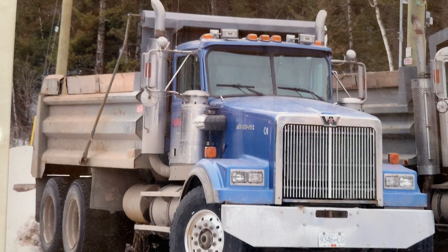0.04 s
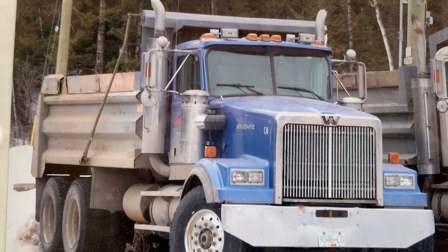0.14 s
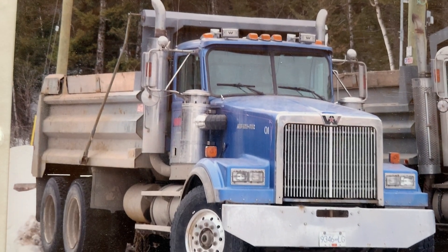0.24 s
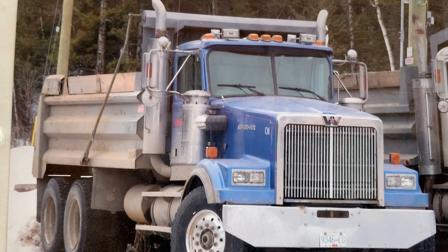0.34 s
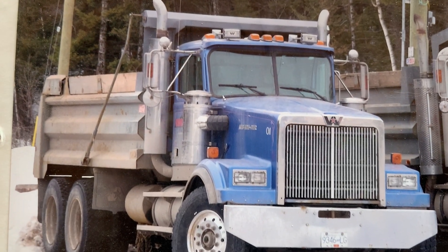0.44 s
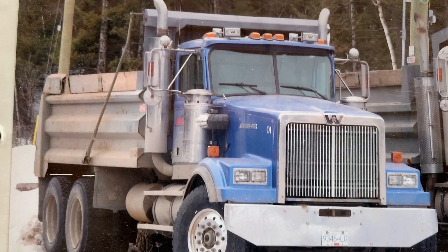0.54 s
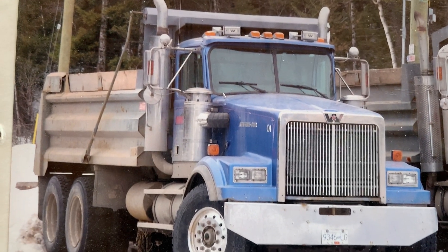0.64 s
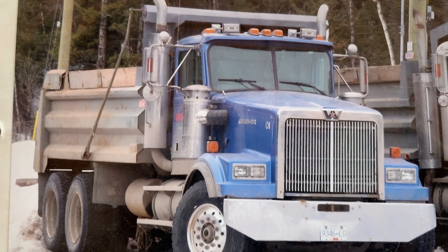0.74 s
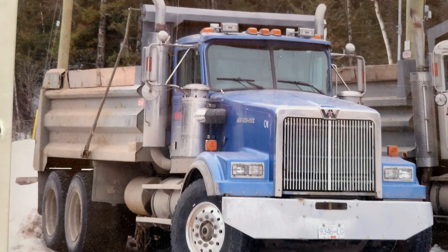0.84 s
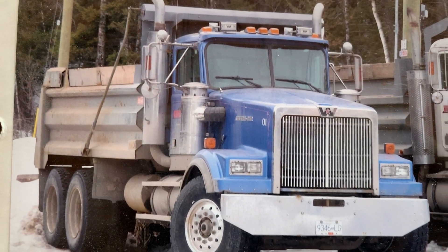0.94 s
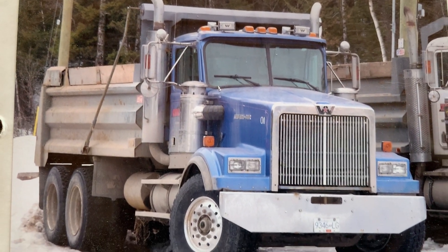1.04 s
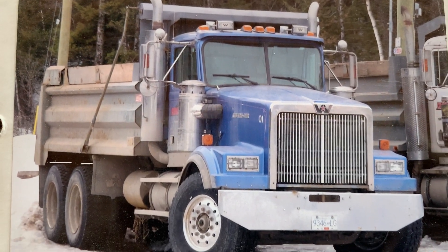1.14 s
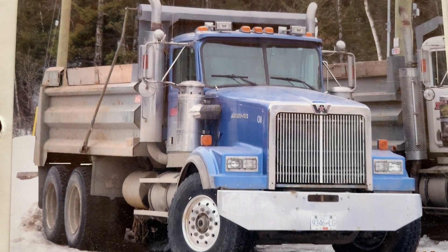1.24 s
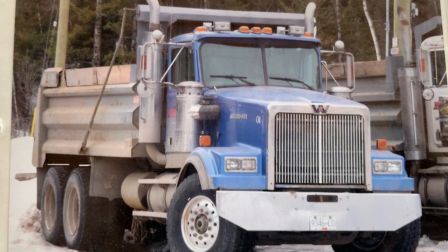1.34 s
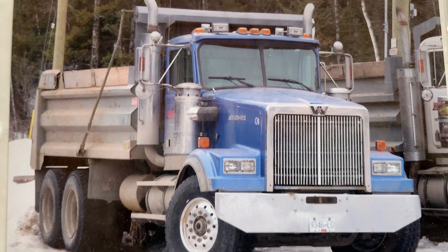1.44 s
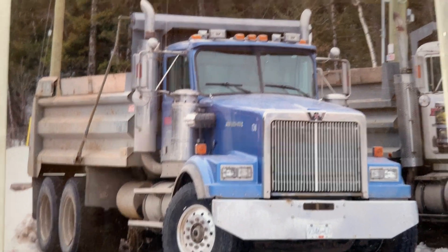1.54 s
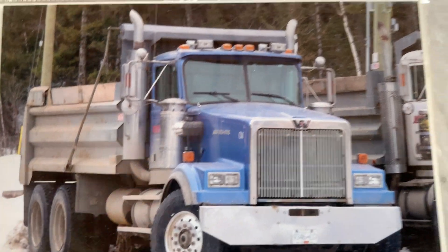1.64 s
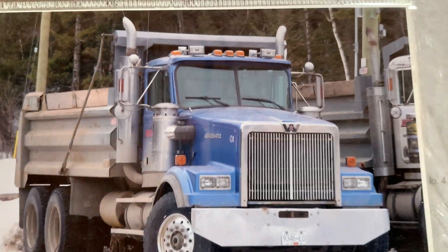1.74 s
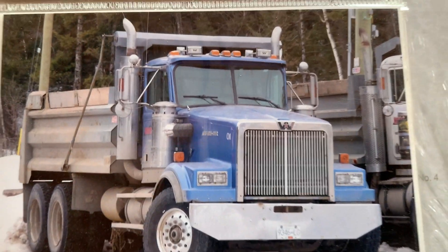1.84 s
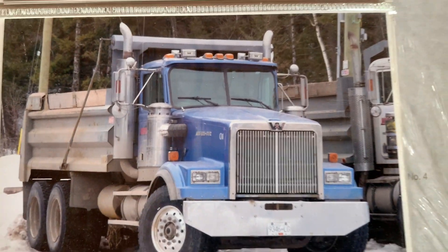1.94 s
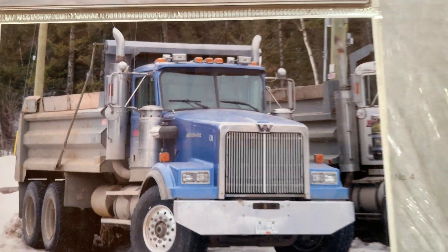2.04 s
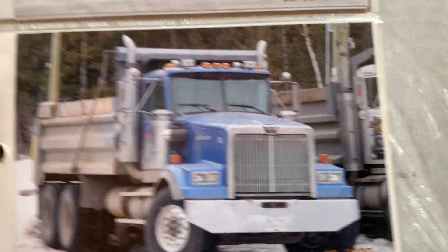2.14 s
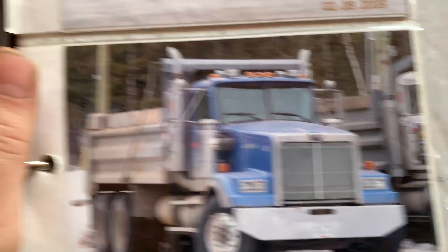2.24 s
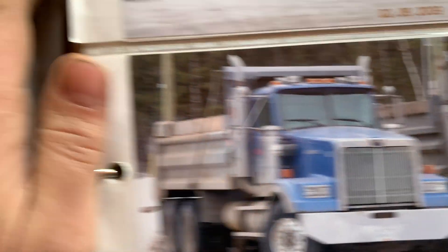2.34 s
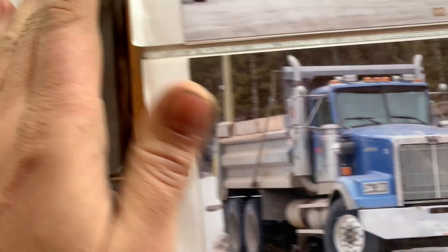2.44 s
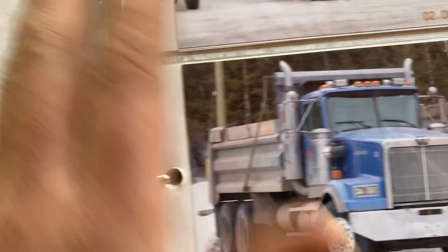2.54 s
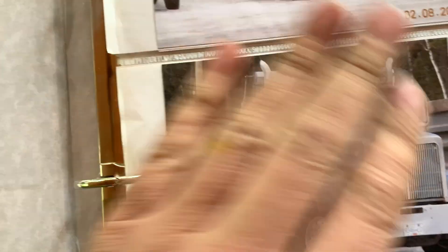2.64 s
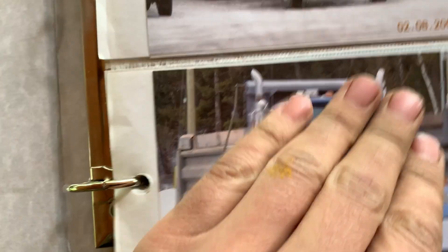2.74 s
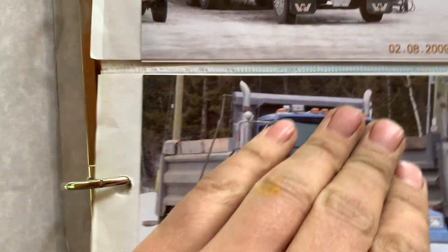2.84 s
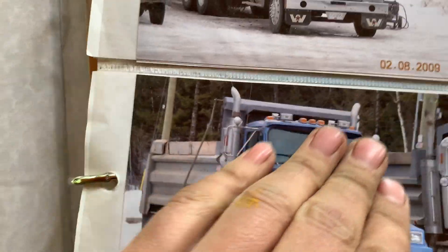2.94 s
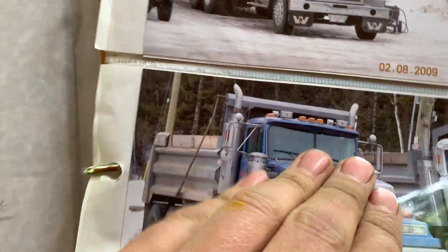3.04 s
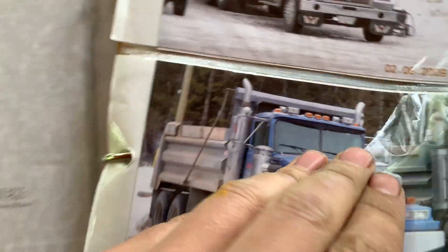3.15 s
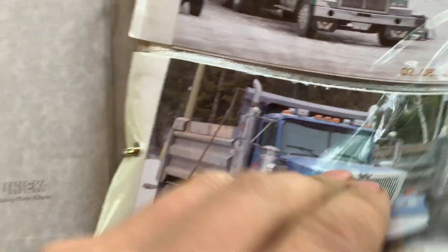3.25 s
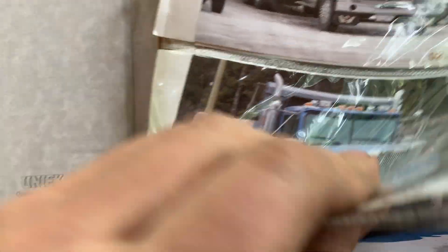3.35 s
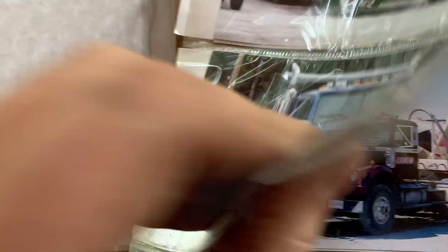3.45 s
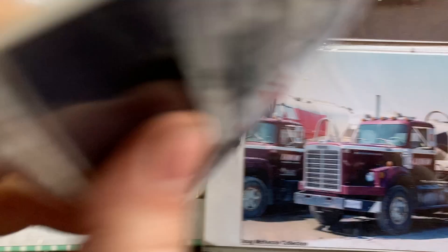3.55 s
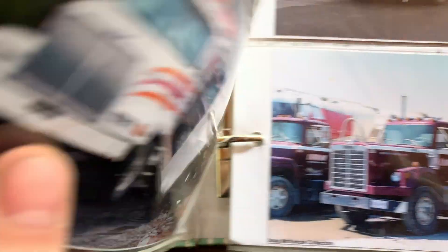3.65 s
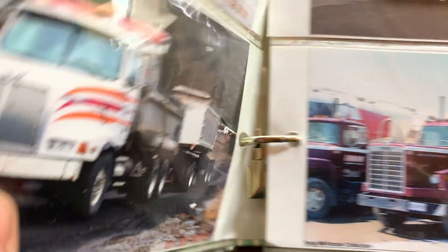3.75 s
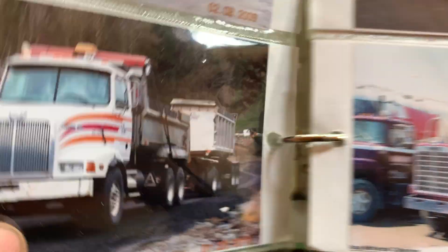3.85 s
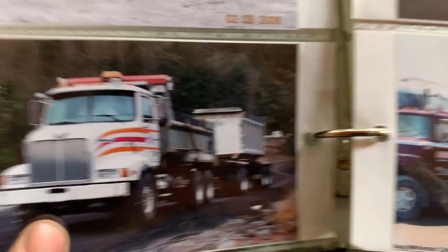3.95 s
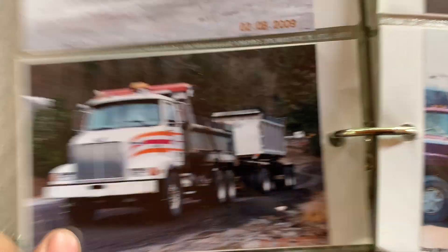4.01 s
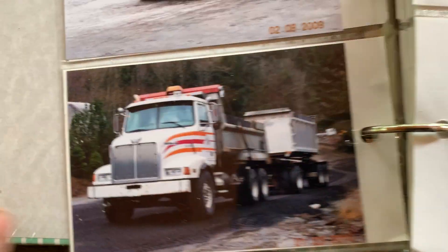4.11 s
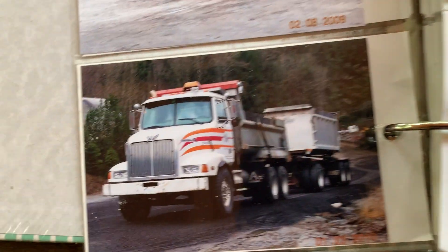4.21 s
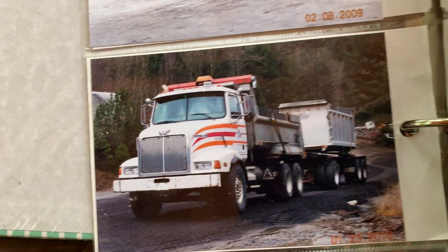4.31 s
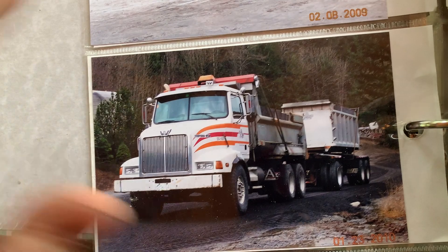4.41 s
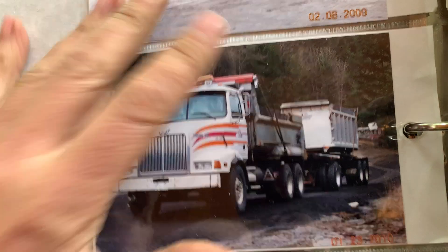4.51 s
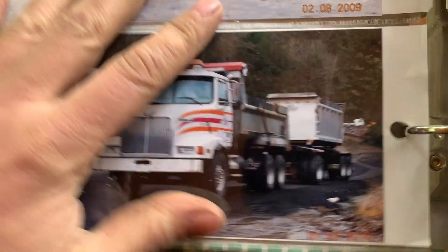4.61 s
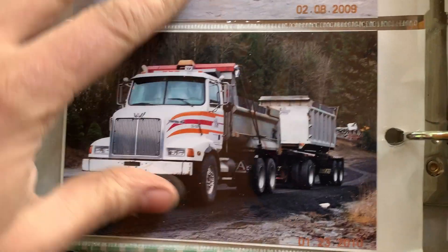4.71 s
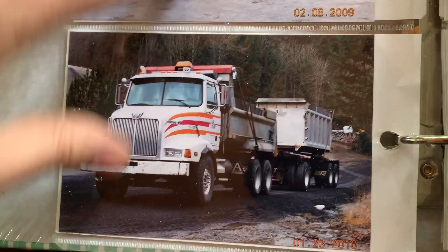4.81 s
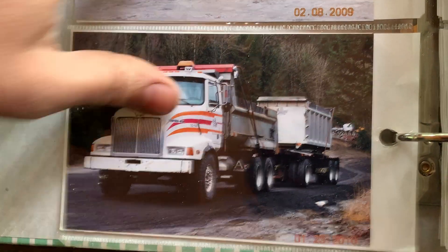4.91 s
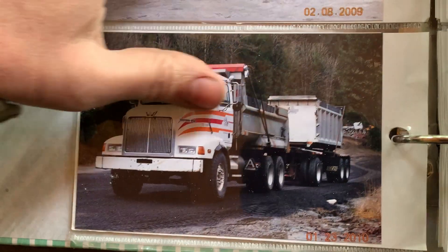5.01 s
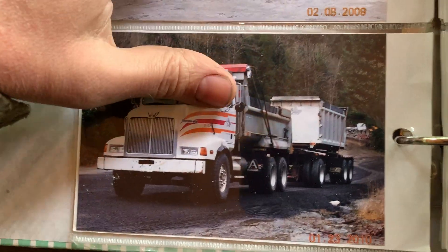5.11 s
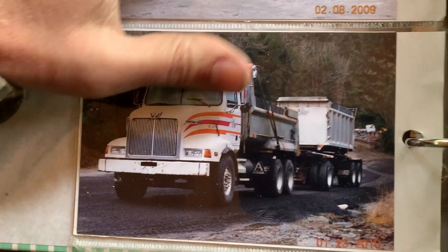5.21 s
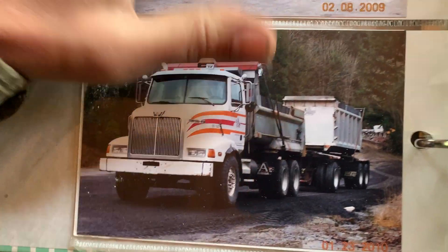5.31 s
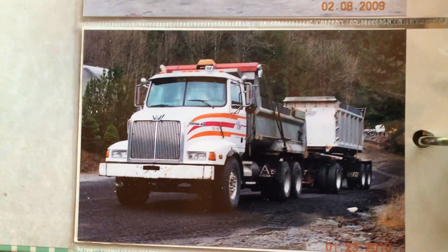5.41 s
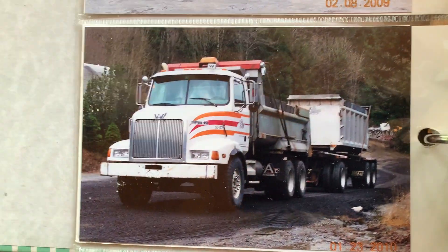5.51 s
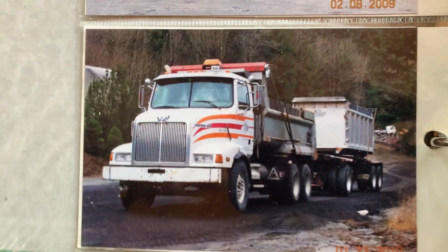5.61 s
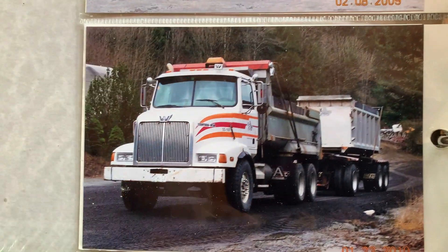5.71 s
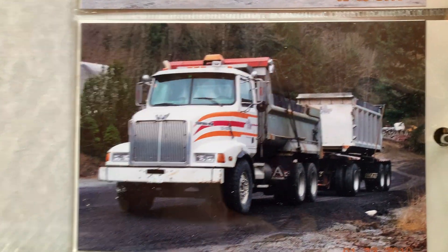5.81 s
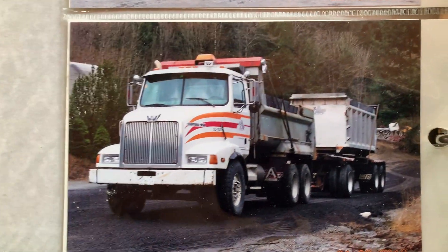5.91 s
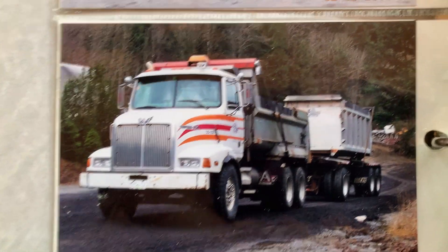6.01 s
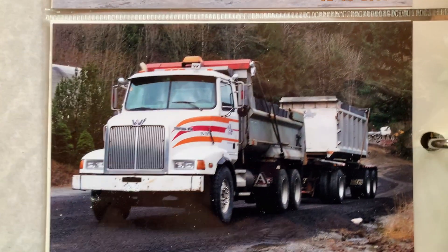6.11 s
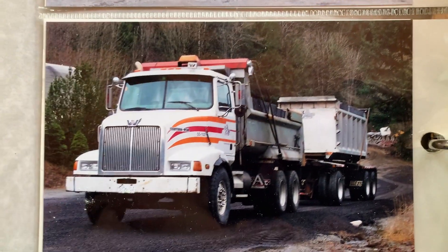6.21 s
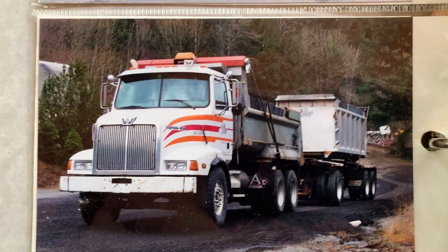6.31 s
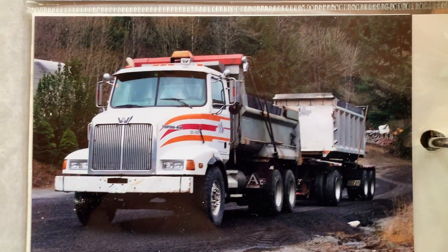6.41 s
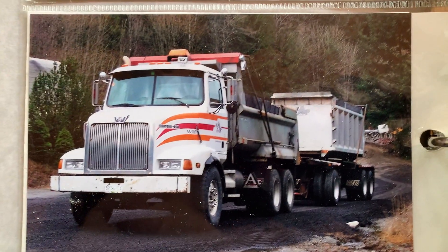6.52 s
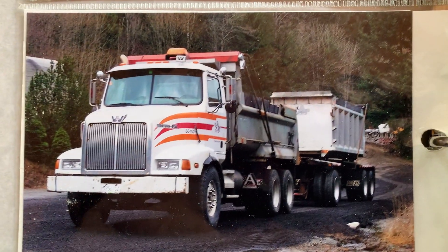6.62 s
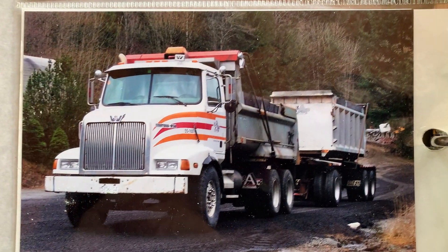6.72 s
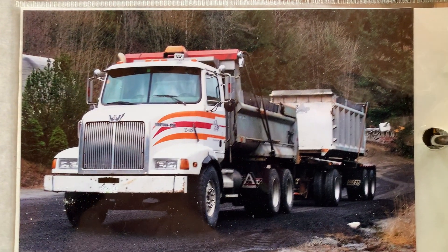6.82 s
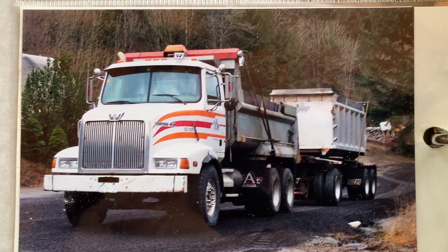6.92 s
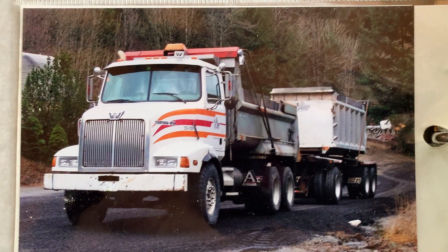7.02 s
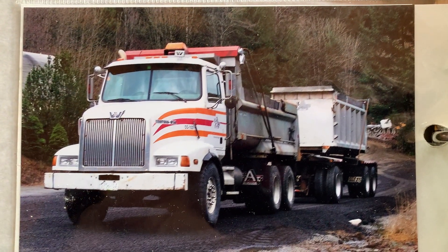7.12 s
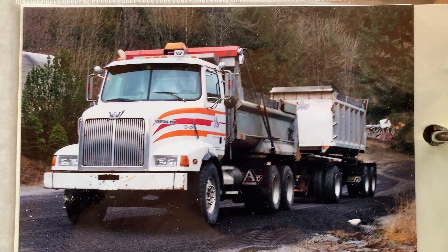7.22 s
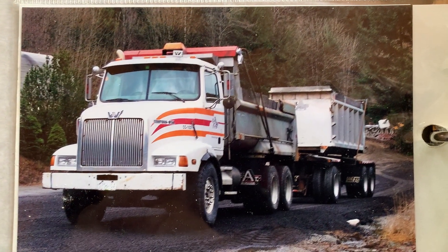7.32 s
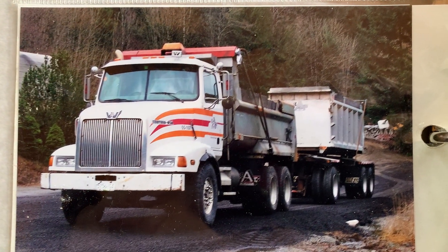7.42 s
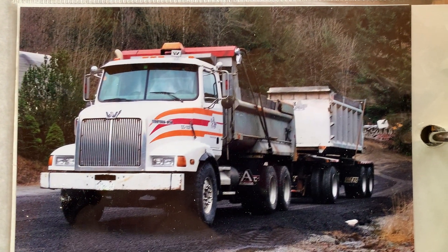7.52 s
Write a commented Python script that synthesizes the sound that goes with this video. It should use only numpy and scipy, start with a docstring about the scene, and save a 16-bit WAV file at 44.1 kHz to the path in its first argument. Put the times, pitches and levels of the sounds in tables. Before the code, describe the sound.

Close, crisp plastic crackling and soft page thumps from a ring-bound album in a small humming room, ending in dry ticks and near quiet.

```python
"""A small room with a fan humming throughout, heard by a close pair of microphones.
Near them, fingers brush a ring-bound photo album: its plastic rustles and snaps, its pages thump, its rings clink.
A palm slides over a sleeve, hissing; the sleeve is then turned with dense crumpling and pressed flat with thumps.
Near the end come dry ticks of cover and rings, and a faint fingertip squeak.
Noise makes the rubs, pulses spread as bending waves make the snaps, sines make the thumps, clinks and hum."""
import sys
import numpy as np
from scipy import signal
from scipy.fft import rfft, irfft
from scipy.io import wavfile
from scipy.ndimage import uniform_filter1d

SR = 44100
rng = np.random.default_rng(int(sys.argv[2]) if len(sys.argv) > 2 else 0)


def log_audio(samples):
    """Write samples as a 16-bit WAV file to the path given in sys.argv[1]."""
    # one column per channel
    frames = np.atleast_2d(samples).T
    # limit to full scale, then quantise
    limited = np.clip(frames, -1, 1)
    pcm = np.round(limited * 32767).astype(np.int16)
    wavfile.write(sys.argv[1], SR, pcm)


N = 333396
T = np.arange(N) / SR
HZ = np.fft.rfftfreq(N, 1 / SR)

# the sleeve is lifted and swung over: time_s, effort_db
TURN = [(3.1, -56.5), (3.164, -54), (3.412, -53), (3.642, -50.5), (3.72, -56), (3.858, -59.5), (3.98, -53),
        (4.02, -54)]
RUB_ATTACK_S, RUB_RELEASE_S = 0.017, 0.018
HUM_CHANGE_S = 0.3  # how gradually the fan changes in strength as the microphones move


def amp(db):
    """Decibels to gain."""
    return 10 ** (np.asarray(db) / 20)


def unit(x):
    """Scales to rms 1."""
    return x / np.sqrt(np.mean(x ** 2) + 1e-20)


def read(points, hz):
    """Reads a spectrum on a log-frequency axis."""
    point_hz, value = np.transpose(points)
    return np.interp(np.log(hz + 1), np.log(point_hz + 1), value)


def coloured(x, colour):
    """Gives x a spectrum, at rms 1."""
    return unit(irfft(rfft(x) * amp(read(colour, HZ)), N))


def wander(hz, size=4096):
    """Slow random drift of rms 1, with little movement faster than hz."""
    drift_hz = np.fft.rfftfreq(size, T[-1] / size)
    slow = irfft(rfft(rng.standard_normal(size)) / (1 + (drift_hz / hz) ** 4))
    return unit(np.interp(T, np.linspace(0, T[-1], size), slow))


def smooth(x, size):
    """Running mean taken twice."""
    return uniform_filter1d(uniform_filter1d(x, size=size), size=size)


def add(mix, s, sound):
    """Mixes a sound in at time s."""
    part = mix[round(s * SR):][:len(sound)]
    part += sound[:len(part)]


def stroke(start_s, length_s, attack_s, release_s):
    """Soft attack, hold and release of one movement of the hand."""
    out = np.zeros(N)
    t = np.arange(-10 * attack_s, length_s + 10 * release_s, 1 / SR)
    attack = (1 + np.tanh(t / attack_s - .5)) / 2
    release = np.exp(-np.maximum(t - length_s, 0) / release_s)
    add(out, start_s + t[0], attack * release)
    return out


def resonance(x, hz, width_hz):
    """Rings x at a pitch that may move, at rms 1."""
    spin = np.exp(2j * np.pi * np.cumsum(hz * np.ones(len(x))) / SR)
    r = np.exp(-np.pi * width_hz / SR)
    # shift the pitch down to zero, ring there, shift it back
    ringing = signal.lfilter([1], [1, -2 * r, r * r], x / spin)
    return unit((spin * ringing).real)


def crackles(per_s, spread_db):
    """Random tiny slips, most of them small, each a burst of a fraction of a millisecond."""
    happens = rng.random(N) < per_s / SR
    size = amp(spread_db * np.minimum(rng.exponential(1, N), 3.5)) * happens
    power = signal.lfilter([1], [1, -np.exp(-1 / (0.0004 * SR))], size ** 2)
    return unit(np.sqrt(power) * rng.standard_normal(N))


def flexed(x, ripple_db):
    """The resonances of the film keep shifting as it bends."""
    spectrum = signal.stft(x, nperseg=512, noverlap=384)[2]
    field = uniform_filter1d(rng.standard_normal(spectrum.shape), size=6, axis=0)
    field = uniform_filter1d(field, size=9, axis=1)
    shifted = spectrum * amp(ripple_db * unit(field))
    return unit(signal.istft(shifted, nperseg=512, noverlap=384)[1][:N])


def rustle(strokes, crumple, flap_db, swish_db, fizz_db, patchy_db):
    """Rubbing and crackles (share 0-1: crumple) drive the sheet's flap, the skin's swish and the creases' fizz.

    Strokes are (effort gain, brightness dB, grip dB)."""
    # colours of the three parts: freq_hz, level_db
    flap_colour = [(25, -9.5), (50, -2), (110, -5.5), (300, -2), (560, -3.5), (750, -1.5), (1050, -0.5),
                   (1400, -5), (2200, -42.5)]
    swish_colour = [(800, -29), (1500, 6.5), (2400, 5), (3200, 2.5), (4200, 2), (5300, -2), (7500, -20.5)]
    fizz_colour = [(3800, -35), (5500, -6.5), (7000, 4), (9000, 4), (11000, 2.5), (13000, 1), (15300, 2.5),
                   (16300, -36)]
    separate = np.sqrt(crumple) * crackles(per_s=550, spread_db=6.2)
    rubbing = np.sqrt(1 - crumple) * rng.standard_normal(N)
    drive = flexed(separate + rubbing, ripple_db=3.2)
    flap = sum(effort * amp(flap_db - bright_db) for effort, bright_db, grip_db in strokes)
    swish = sum(effort * amp(swish_db + grip_db) for effort, bright_db, grip_db in strokes)
    fizz = sum(effort * amp(fizz_db + bright_db) for effort, bright_db, grip_db in strokes)
    parts = ((flap, flap_colour), (swish, swish_colour), (fizz, fizz_colour))
    return sum(coloured(drive, colour) * level * amp(patchy_db * wander(45.1)) for level, colour in parts)


def hum(waver_share=.0012, waver_db=1.0):
    """Steady fan tones that waver a little with the fan's speed and drift in strength."""
    # tones that change in strength as the microphones move: pitch_hz, before_db, after_db, change_s
    tones = [(54.8, -72.5, -61, 2.7), (96.6, -50, -58, 4.8), (156.1, -67, -85, 2),
             (231.8, -87.5, -63.5, 4.2), (240, -82, -72, 4.1), (263.8, -68, -86.5, 1.3),
             (288.5, -75, -67, 2.5), (360.7, -72, -72, 1.4), (383.3, -56, -65.5, 1.2),
             (457, -72, -75, 0.98), (480, -65.5, -73, 3.6), (737.5, -90, -80, 5), (1270, -92.5, -70.5, 4.6)]
    out = np.zeros(N)
    speed = 1 + waver_share * wander(1.0)
    for hz, before_db, after_db, change_s in tones:
        turns = np.cumsum(hz * speed) / SR + rng.random()
        moved = (1 + np.tanh((T - change_s) / HUM_CHANGE_S)) / 2
        level_db = before_db + (after_db - before_db) * moved + waver_db * wander(2.5)
        out += amp(level_db) * np.sqrt(2) * np.sin(2 * np.pi * turns)
    return out


def air():
    """The dull, steady rush of the fan's air and the breathy whistle of its grille."""
    # colour of the moving air: freq_hz, level_db
    air_colour = [(20, -14.5), (31, -17.5), (42, -8), (55, 0), (75, -1.5), (125, -8.5), (160, -12),
                  (200, -13), (330, -15.5), (600, -20), (800, -20.5), (1100, -17.5), (1800, -23.5),
                  (2500, -35), (3500, -51), (14000, -56.5)]
    # its course: time_s, level_db
    air_course = [(0, -52.5), (1.5, -54.5), (4.3, -57), (5.8, -56), (6.4, -53), (7.5, -54)]
    # whistle at the later microphone position: change_s, pitch_hz, width_hz, level_db
    whistle_settings = (4.6, 1230, 160, -70)
    change_s, pitch_hz, width_hz, db = whistle_settings
    moved = (1 + np.tanh((T - change_s) / HUM_CHANGE_S)) / 2
    whistle = amp(db) * moved * resonance(rng.standard_normal(N), pitch_hz, width_hz)
    level_db = np.interp(T, *np.transpose(air_course)) + .6 * wander(3)
    return whistle + coloured(rng.standard_normal(N), air_colour) * amp(level_db)


def rubs():
    """Fingers brush, grip and smooth the sleeve: soft-edged bursts of rustle."""
    # strokes: start_s, length_s, effort_db, brightness_db, grip_db
    # brightness above 0: creases fizz, below: the whole sheet flaps; grip: swish of the skin
    rub_table = [(1.532, 0.025, -60.5, -11, 0), (1.56, 0.022, -62.5, -6, 12.5),
                 (1.874, 0.016, -63.5, -14, 9), (1.954, 0.13, -72, 6.5, 13.5), (2.57, 0.12, -83.5, -5, 3),
                 (2.729, 0.051, -63, 3.5, -3), (2.799, 0.078, -60.5, 9, 9.5), (2.908, 0.07, -58, -0.5, 13),
                 (2.99, 0.035, -76, 15, -17), (3.044, 0.046, -57, 0.5, 4.5), (3.181, 0.016, -50, -7, 9.5),
                 (3.25, 0.044, -58, 3.5, -1), (3.454, 0.037, -49, 1.5, 3.5), (3.57, 0.012, -54, 18, -4),
                 (3.765, 0.039, -54, -3, 2), (3.821, 0.027, -42.5, -0.5, 5.5),
                 (3.902, 0.019, -44, -5.5, 0.5), (3.985, 0.024, -58.5, -14, -16),
                 (4.02, 0.073, -60.5, 9.5, -10), (4.058, 0.071, -52.5, 2.5, 6.5), (4.57, 0.054, -59, -2, 8),
                 (4.625, 0.088, -60.5, 9, 5), (4.73, 0.11, -67.5, 3, 4), (4.867, 0.055, -69, 14.5, 12),
                 (4.976, 0.03, -47.5, -2, -2), (5.02, 0.095, -65.5, -3.5, -3.5),
                 (5.19, 0.14, -77.5, 2, 5.5), (5.268, 0.14, -65, -4, 2), (5.386, 0.081, -68, 6.5, 5),
                 (6.021, 0.036, -71.5, -13, 13), (6.275, 0.065, -79.5, -2, 11.5),
                 (6.41, 0.096, -84.5, 0, 6)]
    strokes = [(amp(db) * stroke(s, length_s, RUB_ATTACK_S, RUB_RELEASE_S), bright_db, grip_db)
               for s, length_s, db, bright_db, grip_db in rub_table]
    return rustle(strokes, crumple=.25, flap_db=-0.5, swish_db=-2.0, fizz_db=2.5, patchy_db=1.75)


def snaps(size=1024, count=24, bend_s=.0014, ring_s=0.0015, ring_db=-4, bass_db=-2):
    """Each buckle is a pulse that spreads as a bending wave, treble first, and leaves the film ringing briefly."""
    # the film buckles: time_s, strength_db, pitch_hz (where the snap is strongest)
    snap_table = [(1.89, -13, 2220), (1.9065, -10.5, 2590), (2.7693, -10.5, 5700), (2.7985, -16, 11000),
                  (2.8115, -27, 3500), (2.8225, -12, 2370), (2.8341, -5.5, 12000), (2.856, -3.5, 10400),
                  (3.0778, -11.5, 4500), (3.147, -28, 8000), (3.1612, -8, 6900), (3.1684, -2, 10600),
                  (3.1723, -13, 10000), (3.1768, -16.5, 9000), (3.1883, 2, 7500), (3.1915, 5.5, 6040),
                  (3.1967, 8, 9200), (3.2056, 7, 8350), (3.2143, -12, 7500), (3.2246, -14, 8000),
                  (3.228, -3, 12100), (3.2395, -4.5, 5370), (3.251, -17, 8000), (3.3118, -6.5, 10000),
                  (3.349, -4, 6950), (3.36, -15.5, 8000), (3.3755, -16, 7000), (3.385, -9, 6500),
                  (3.3945, -16, 9000), (3.3972, -12, 7000), (3.4141, 1, 7300), (3.426, -15.5, 9000),
                  (3.4287, -14.5, 7000), (3.4385, -5.5, 7500), (3.4449, 10, 6800), (3.452, -11.5, 7500),
                  (3.4709, -7.5, 6000), (3.4845, -14, 7000), (3.4896, 4.5, 4400), (3.5115, -11.5, 6500),
                  (3.5341, -5, 8500), (3.546, -8.5, 7000), (3.5528, -1.5, 7500), (3.562, -9, 5500),
                  (3.5725, -10, 7000), (3.587, -3, 7950), (3.5945, -3, 7000), (3.6088, 2.5, 7500),
                  (3.6165, -4, 6000), (3.6207, 11.5, 7700), (3.6255, 10, 8200), (3.6336, -3.5, 6500),
                  (3.6555, -12.5, 7000), (3.6605, -8.5, 6500), (3.6885, -2, 6760), (3.697, -2, 6340),
                  (3.7005, -10, 7000), (3.728, -17.5, 8000), (3.7856, 0.5, 7060), (3.8063, -2.5, 6230),
                  (3.8167, -10.5, 6500), (3.8225, -14, 6500), (3.8285, -1, 6500), (3.8418, -4, 2430),
                  (3.8733, -6.5, 8000), (3.8999, -4, 3550), (3.9142, -3.5, 7060), (3.927, -6.5, 8150),
                  (3.9325, -12, 8000), (3.9365, -11, 8000), (3.9839, -11.5, 7500), (3.9868, -14.5, 8000),
                  (3.9925, -16.5, 8000), (4.078, 1.5, 10000), (4.091, 0.5, 7000), (4.1025, -1, 6600),
                  (4.105, 8.5, 4000), (4.1355, -12, 6000), (4.575, -15, 2600), (4.608, -3.5, 4970),
                  (4.612, -16, 2200), (4.911, -7, 9000), (4.9145, -4, 2740), (4.9195, -6, 7000),
                  (4.996, -10, 10500), (5.095, -26, 9400), (5.0005, 1, 10400), (5.0058, 3.5, 12840),
                  (5.008, -17.5, 2790), (5.015, -12, 1500), (5.029, -14, 9530), (5.1692, -22, 9600),
                  (5.279, -15, 1000), (5.3186, -13.5, 6000), (5.438, -16.5, 3500), (5.4581, -14.5, 12280)]
    # the film's own colour: freq_hz, level_db
    film_colour = [(2200, 2), (3200, -2), (4200, -2.5), (5200, -8), (6200, -3), (7200, -3.5), (9000, -0.5),
                   (11000, 0.5), (15000, 0)]
    below_db_per_oct, above_db_per_oct = 9.5, 10.5  # the spectrum falls away on both sides of the pitch
    crinkle_db, crinkle_spread_db = -23.5, 3
    crinkle_hz, crinkle_spread_oct = 6500, 0.42
    out = np.zeros(N)
    t, hz = np.arange(size) / SR, np.fft.rfftfreq(size, 1 / SR)
    delay_s = bend_s * np.sqrt(1000 / (hz + 200))
    travel = np.exp(-2j * np.pi * np.cumsum(delay_s - delay_s[-1]) * SR / size)
    # small chance crinkles during the turn
    times_s = rng.uniform(TURN[0][0], TURN[-1][0], count)
    crinkles = [(s, crinkle_db + crinkle_spread_db * a, crinkle_hz * 2 ** (crinkle_spread_oct * b))
                for s, (a, b) in zip(times_s, rng.standard_normal((count, 2)))]
    for s, db, pitch_hz in crinkles + list(snap_table):
        noise, shape = rng.standard_normal((2, size))
        ring = noise * np.exp(-t / ring_s)
        pulse = rfft(amp(ring_db) * ring / np.linalg.norm(ring)) + 1
        # every crease has its own resonances
        pulse *= amp(4 * unit(smooth(shape, 11))[:len(hz)])
        pulse /= np.sqrt(uniform_filter1d(abs(pulse) ** 2, size=101))
        octaves = np.log2((hz + 1) / pitch_hz)
        slope_db = np.minimum(below_db_per_oct * octaves, -above_db_per_oct * octaves)
        colour_db = db + slope_db + read([(150, bass_db), (1000, 0)], hz) + read(film_colour, hz)
        snap = np.roll(irfft(pulse * travel * amp(colour_db)), size // 8)
        add(out, s - (size // 8) / SR, snap)
    return out


def thumps(glide=0.47, knock_decay=0.8):
    """The stack of pages knocks and flexes: the higher bending waves come first, so the pitch drops."""
    # pages are bumped, land or are pressed: start_s, peak_db, pitch_hz, knock_db (dull knock of the stack)
    thump_table = [(1.898, -33, 256, -56), (1.9, -28.5, 108, -56), (1.91, -28.5, 61.6, -46),
                   (1.904, -33, 820, -55), (1.941, -39, 133, -66), (2.333, -30, 994, -53),
                   (2.526, -29, 336, -46), (2.77, -26.5, 300, -43.5), (3.057, -44.5, 228, -55.5),
                   (3.192, -30, 790, -56), (3.205, -29, 970, -55.5), (3.627, -40.5, 366, -46),
                   (3.842, -52.5, 220, -40), (3.847, -31, 58, -52.5), (3.901, -30.5, 483, -45),
                   (3.914, -27, 900, -62), (4.105, -39.5, 466, -46), (4.123, -34.5, 65, -45),
                   (4.575, -38, 273, -48), (4.581, -24.5, 117.7, -41), (4.586, -24.5, 68, -40.5),
                   (4.613, -20, 54.5, -53), (4.803, -37, 63, -53), (4.994, -21.5, 66, -45),
                   (5.009, -31.5, 840, -59), (5.301, -35, 61.8, -46), (6.181, -42, 165, -76)]
    # colour of the knock: freq_hz, level_db
    knock_colour = [(60, -17), (130, 12.5), (200, 17), (300, 7), (480, -7.5), (650, -9.5), (850, -5.5),
                    (1200, -2), (2000, -25.5)]
    ref_swell_s, ref_hz, swell_law = .016, 56, 0.88  # a low thump swells slowly, a higher one faster
    start_ratio = 1.6  # each starts this far above its pitch
    out, knock = np.zeros(N), np.zeros(N)
    t = np.arange(SR // 4) / SR
    for s, db, pitch_hz, knock_db in thump_table:
        swell_s = ref_swell_s * (ref_hz / pitch_hz) ** swell_law
        u = t / swell_s
        hz = pitch_hz * (1 + (start_ratio - 1) * np.exp(-u / glide))
        swell = (u * np.exp(1 - u)) ** 2.7
        add(out, s, amp(db) * swell * np.sin(2 * np.pi * np.cumsum(hz) / SR))
        decay = np.exp(-t / (knock_decay * swell_s + 0.021))
        add(knock, s, amp(knock_db) * np.minimum(t / 0.0014, 1) * decay)
    return out + knock * coloured(rng.standard_normal(N), knock_colour)


def binder():
    """Short, faint ringing of the metal rings, which chatter against the sleeves."""
    # the rings are nudged: time_s, level_db, free_share (share of the ring time that the hand leaves, 0-1)
    clink_table = [(1.904, -48.5, 0.53), (6.179, -59, 1)]
    # modes of the rings: pitch_hz, level_db, t60_s
    modes = [(1420, -18, 0.03), (1910, -5, 0.19), (2280, -13, 0.025), (2820, 3.5, 0.061), (3670, -6, 0.025),
             (3750, 6.5, 0.019), (3970, -8, 0.04), (3880, -6.5, 0.37)]
    out, t = np.zeros(N), np.arange(SR // 3) / SR
    for s, db, free_share in clink_table:
        for hz, mode_db, t60_s in modes:
            chatter = unit(smooth(rng.standard_normal(len(t)), 70))
            decay_db = -60 * t / (t60_s * free_share)
            add(out, s, amp(db + mode_db + decay_db) * chatter * np.sin(2 * np.pi * hz * t))
    return out


def swipes(stop_s=0.0021):
    """Short, broadband rubs of a finger that swell as it speeds up and break off as it stops."""
    # stop_at_s, level_db, swell_s
    swipe_table = [(1.912, -68, 0.011), (2.826, -39, 0.01), (2.98, -40.5, 0.016), (3.85, -45, 0.01),
                   (4.107, -28.5, 0.009), (4.613, -33.5, 0.0042), (4.918, -30.5, 0.0083),
                   (5.011, -31.5, 0.011), (5.442, -43.5, 0.011)]
    # freq_hz, level_db
    swipe_colour = [(200, -29.5), (700, -2), (2000, -2.5), (2700, 3), (3300, -7.5), (4500, -6), (7000, 1.5),
                    (11000, 0.5), (15000, 2.5), (16300, -25.5)]
    level = sum(amp(db) * np.exp(-np.maximum((s - T) / swell_s, (T - s) / stop_s))
                for s, db, swell_s in swipe_table)
    slips = rng.standard_normal(N) + .5 * crackles(per_s=3000, spread_db=3)
    return level * coloured(flexed(slips, ripple_db=2.8), swipe_colour)


def slide():
    """Skin on plastic: dense, uneven slips; the moving palm frees and damps the sheet's resonances in turn."""
    # colour of the hiss: freq_hz, level_db
    slide_colour = [(60, -18), (150, -7.5), (280, -2.5), (550, -6.5), (750, -4.5), (1000, -1), (1500, -1),
                    (2400, -1.5), (4000, -8), (7000, -9.5), (10000, -6.5), (15400, -12), (16200, -49)]
    # resonances of the sheet under the palm: pitch_hz, width_hz, level_db
    sheet_modes = [(340, 90, -15), (694, 50, -22), (945, 90, -16), (1230, 80, -21), (2080, 90, -18),
                   (2300, 90, -15), (2540, 110, -17)]
    start_s, length_s, level_db = 2.1327, 0.48, -35
    saturation = 1.84  # the hiss levels off once the palm is under way
    touch_db = -24.5  # the palm already brushes the film before it gathers speed
    drift_share, sway_db = 0.026, 6  # the resonances shift in pitch and strength as the palm moves
    slips = rng.standard_normal(N) + .5 * crackles(per_s=2500, spread_db=2)
    hiss = coloured(flexed(slips, ripple_db=2.8) * amp(1.1 * wander(110)), slide_colour)
    sheet = np.zeros(N)
    drift = 1 + drift_share * wander(9)[:SR]
    for hz, width_hz, db in sheet_modes:
        freed = amp(sway_db * np.tanh(wander(17)[:SR]))
        ringing = resonance(rng.standard_normal(SR), hz * drift, width_hz)
        add(sheet, start_s, amp(db) * freed * ringing)
    # one arch of speed
    speed = np.sin(np.pi * np.clip((T - start_s) / length_s, 0, 1)) ** 2
    touch = amp(touch_db) * stroke(start_s - .03, length_s / 2, RUB_ATTACK_S, RUB_RELEASE_S)
    return (hiss + sheet) * (np.tanh(saturation * speed) + touch) * amp(level_db)


def turn(level_db=-1.5):
    """The sleeve crumples unevenly as it swings over, mostly in separate crackles, and then settles."""
    bright_db, grip_db, release_s = 9.5, 3, 0.059
    start_s, end_s = TURN[0][0], TURN[-1][0]
    effort_db = np.interp(T, *np.transpose(TURN)) + level_db + 1.5 * wander(25)
    effort = amp(effort_db) * stroke(start_s, end_s - start_s, RUB_ATTACK_S, release_s)
    return rustle([(effort, bright_db, grip_db)], crumple=.7,
                  flap_db=2.5, swish_db=-2.5, fizz_db=-6.5, patchy_db=2)


def ticks(size=1024, ring_s=.0022, width_oct=.42):
    """Each tick is a sharp, heavily damped knock, about an octave wide."""
    # dry ticks of the album's cover and rings as the grip shifts: time_s, strength_db, pitch_hz
    tick_table = [(5.803, -18, 1150), (5.812, -21, 900), (5.8485, -19, 1300), (5.877, -22, 1400),
                  (5.892, -18, 1300), (5.914, -25, 1600), (5.931, -27, 1500), (6.1595, -21, 1050),
                  (6.179, -14, 1500), (6.179, -28, 3100)]
    out = np.zeros(N)
    t, hz = np.arange(size) / SR, np.fft.rfftfreq(size, 1 / SR)
    for s, db, pitch_hz in tick_table:
        ring = rng.standard_normal(size) * np.exp(-t / ring_s)
        band = np.exp(-(np.log2((hz + 1) / pitch_hz) / width_oct) ** 2 / 2)
        pulse = 1 + rfft(ring / np.linalg.norm(ring))
        tick = np.roll(irfft(pulse * band), size // 8)
        add(out, s - (size // 8) / SR, amp(db) * tick)
    return out


def squeak(sag=.11):
    """A fingertip sticks and slips on the film: a short, faint, fuzzy tone that sags as it slows."""
    # start_s, length_s, level_db, pitch_hz, width_hz
    squeak_settings = (6.72, .09, -75, 2800, 280)
    s, length_s, db, pitch_hz, width_hz = squeak_settings
    out, u = np.zeros(N), np.linspace(0, 1, round(length_s * SR))
    tone = resonance(rng.standard_normal(len(u)), pitch_hz * (1 - sag * (u - .5)), width_hz)
    add(out, s, amp(db) * np.sin(np.pi * u) * tone)
    return out


def album():
    """All that the hand does to the pages."""
    rubbed = rubs() + swipes() + slide() + turn() + squeak()
    struck = snaps() + thumps() + binder() + ticks()
    return rubbed + struck


def ports(x, other, near):
    """Two microphone ports hear x with a phase lag; the right one also hears an unlike part, in quadrature."""
    # freq_hz, likeness_near (0-1), likeness_room (0-1), left_lead_rad, left_minus_right_db
    port_table = [(70, .97, .95, 0, -.7), (170, .93, .85, .05, -.3), (350, .78, .6, .3, -1),
                  (550, .62, .3, .45, -.5), (950, .82, .25, .7, 1.5), (1250, .72, .25, 1.3, .4),
                  (1700, .5, .35, 3.3, -.7), (2600, .45, .25, 5.6, -1.2), (4500, .3, .2, 7.5, -2.5),
                  (5600, .4, .3, 6.9, -4), (6600, .8, .55, 5.8, -.8), (8550, .99, .97, 3.1, .3),
                  (11000, .95, .8, 0, 0), (13350, .99, .97, -3.15, 0), (16000, .92, .8, -6.5, 0)]
    hz, *columns = np.transpose(port_table)
    like_near, like_room, lead, balance_db = (np.interp(HZ, hz, column) for column in columns)
    like = like_near if near else like_room
    left = rfft(x)
    right = (like * left - 1j * np.sqrt(1 - like ** 2) * rfft(other)) * np.exp(-1j * lead)
    return irfft(np.array([left * amp(balance_db / 2), right * amp(-balance_db / 2)]), N)


def room(x, first_s=.004):
    """A short tail from the walls: noise that fades at a rate set by frequency, fastest around 5 kHz."""
    # decay time: freq_hz, t60_s
    room_t60 = [(100, 0.9), (1000, 0.48), (5000, 0.083), (15000, 0.24)]
    hz, t, spectrum = signal.stft(rng.standard_normal((2, SR // 2)), SR, nperseg=256)
    decay_db = -60 * t / read(room_t60, hz)[:, None]
    tail = signal.istft(spectrum * amp(decay_db) * (t > first_s), SR, nperseg=256)[1]
    tail /= np.linalg.norm(tail[0])
    return ports(*signal.fftconvolve(x[None], tail, axes=1)[:, :N], near=False)


def scene(room_db=-20):
    """The album close to the microphones, the room and its fan behind."""
    tones, pages = hum(), album()
    fan = ports(air() + tones, air() + tones, near=False)
    return fan + ports(pages, album(), near=True) + amp(room_db) * room(pages)


def record(dry, low_cut_hz=38, edge_hz=16550):
    """The recorder's low cut and band limit."""
    cut = irfft(rfft(dry) / np.sqrt(1 + (low_cut_hz / (HZ + 1)) ** 8), N)
    band_limit = signal.firwin(255, edge_hz, window=("kaiser", 9), fs=SR)
    return signal.oaconvolve(cut, band_limit[None], "same")


dry = scene()
out = record(dry)
log_audio(out)
```